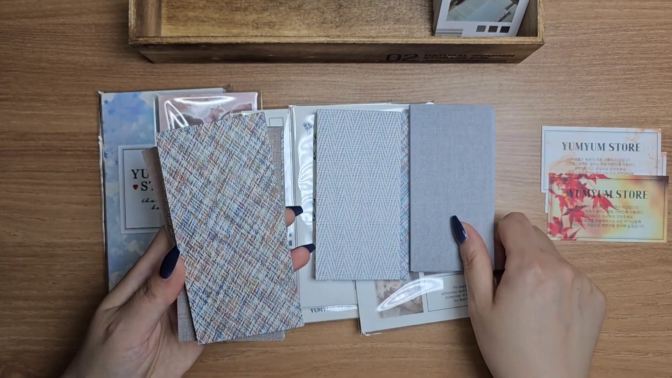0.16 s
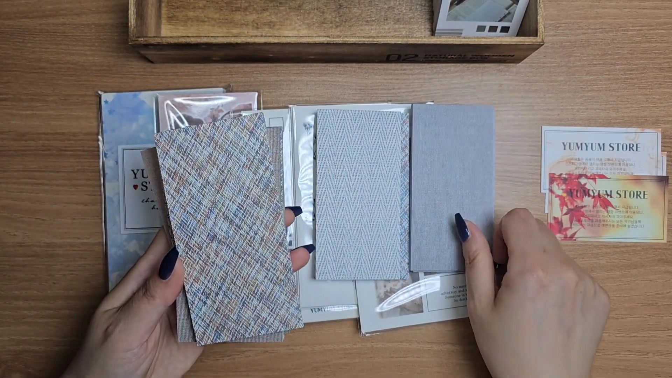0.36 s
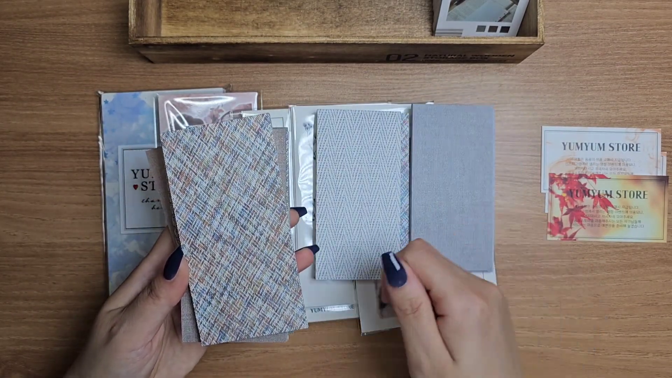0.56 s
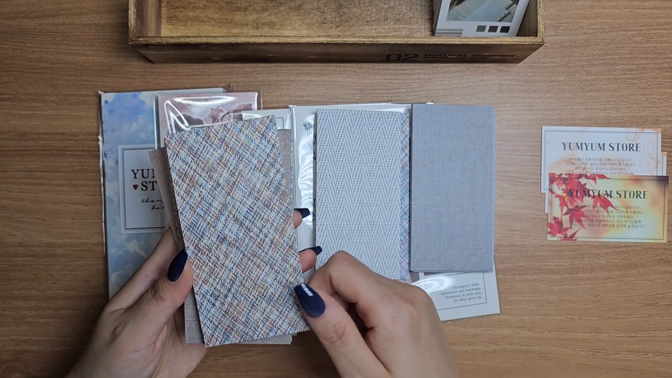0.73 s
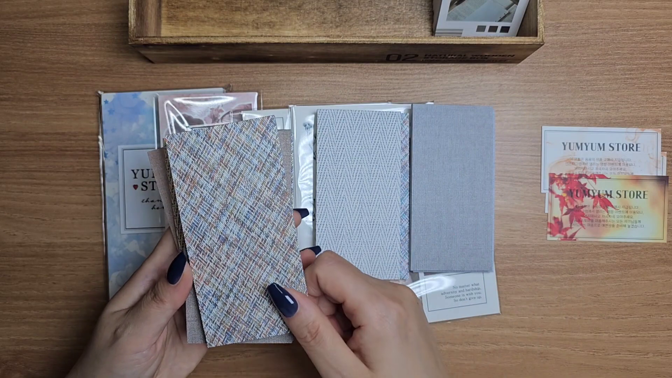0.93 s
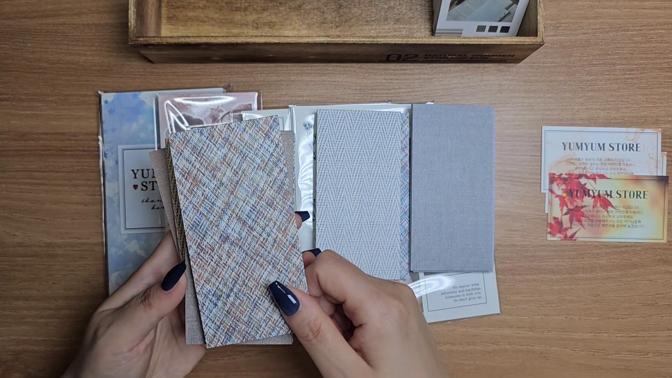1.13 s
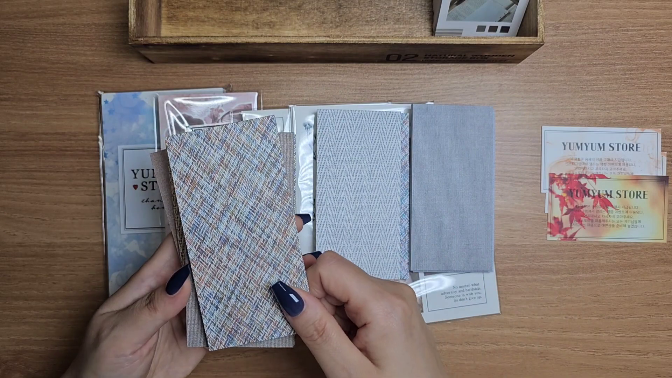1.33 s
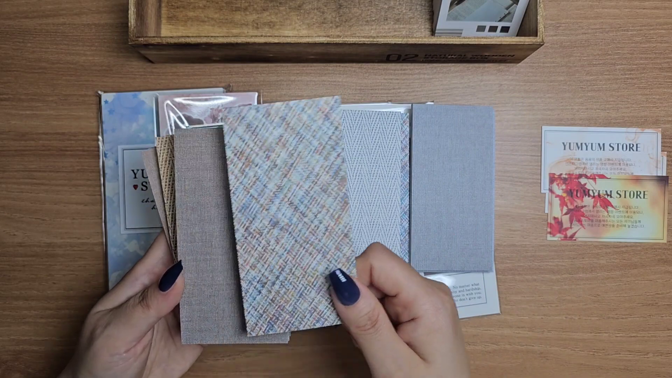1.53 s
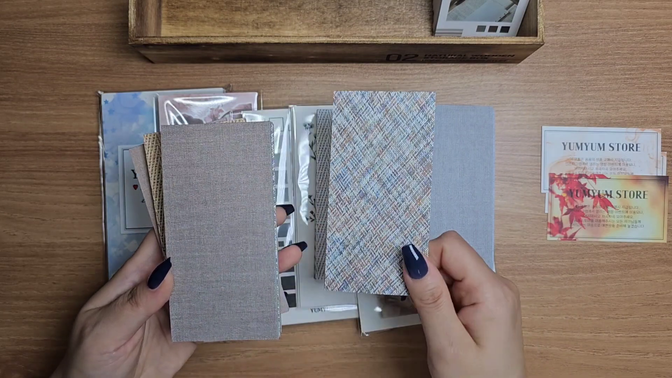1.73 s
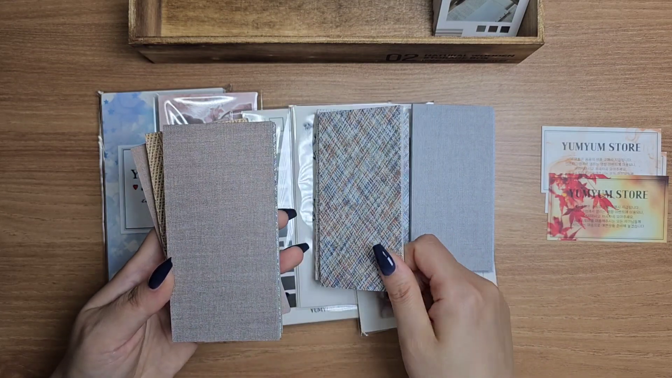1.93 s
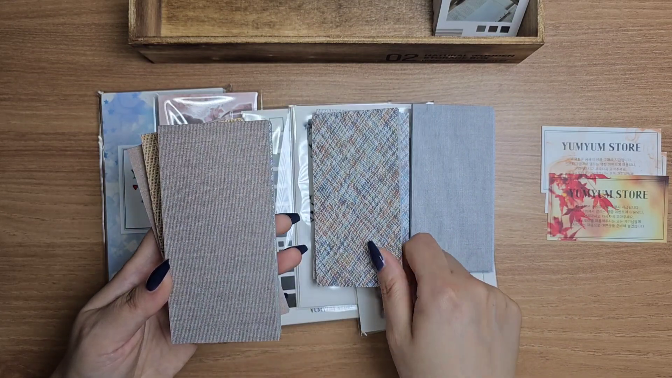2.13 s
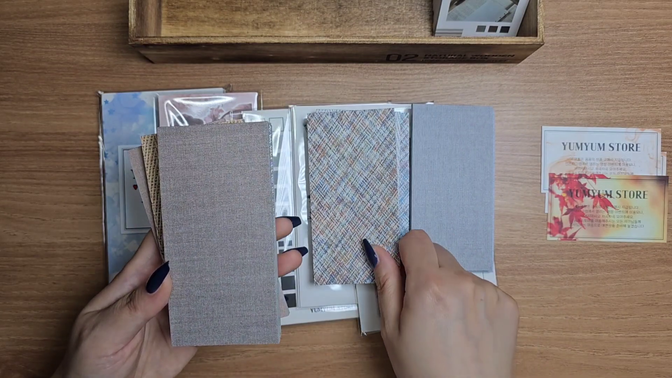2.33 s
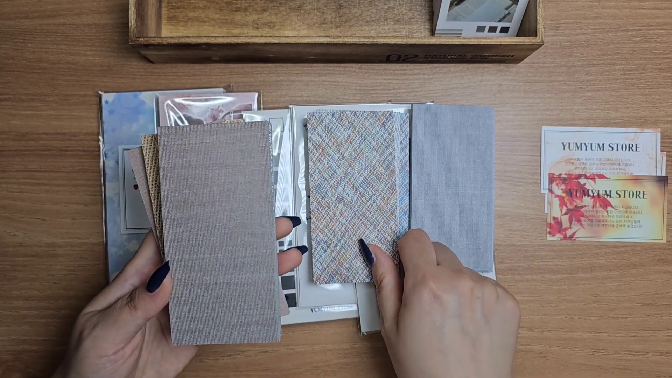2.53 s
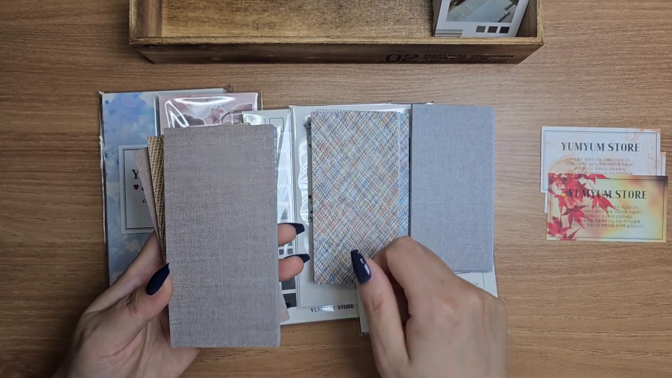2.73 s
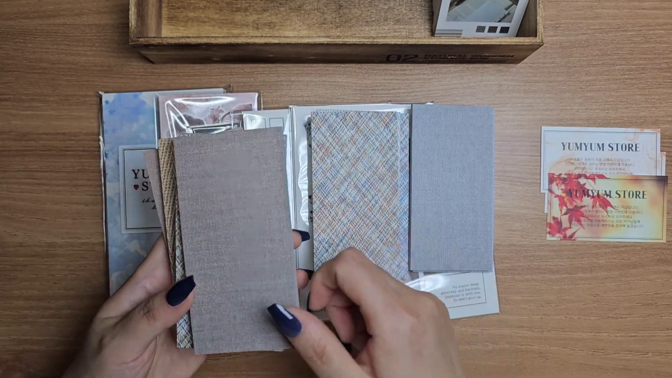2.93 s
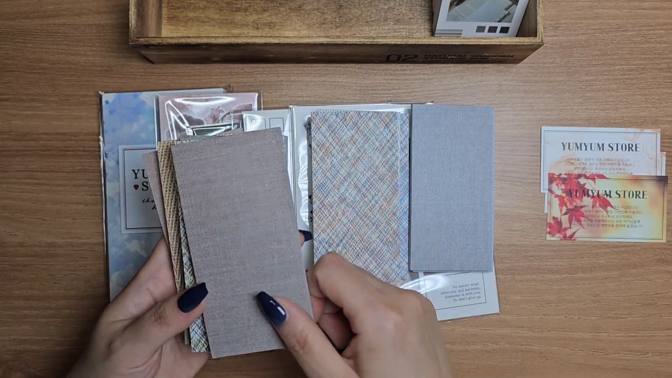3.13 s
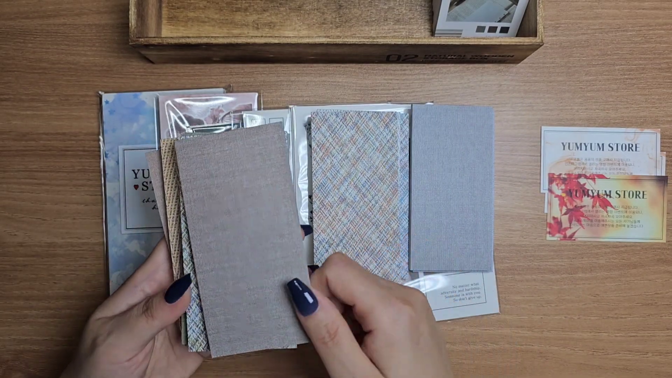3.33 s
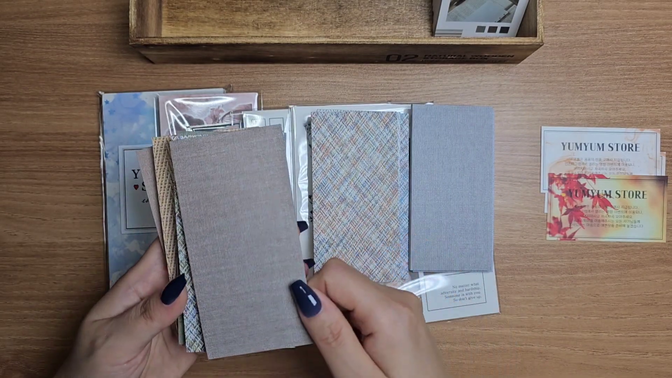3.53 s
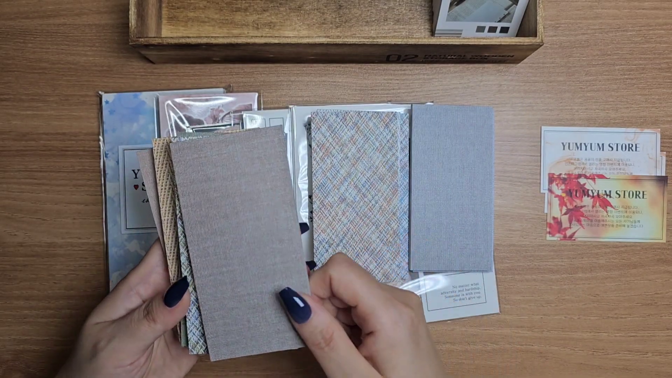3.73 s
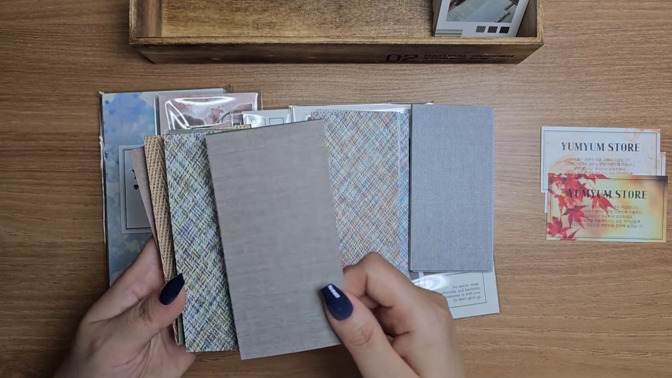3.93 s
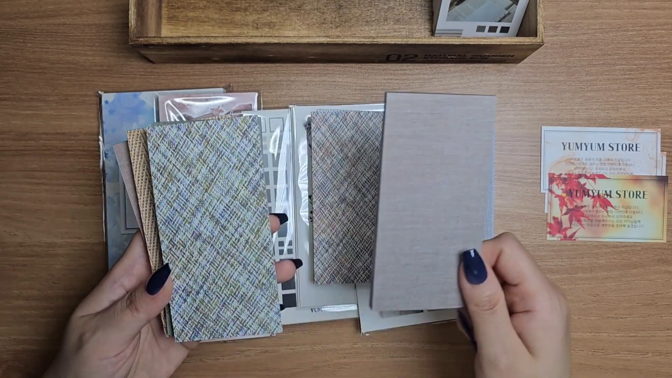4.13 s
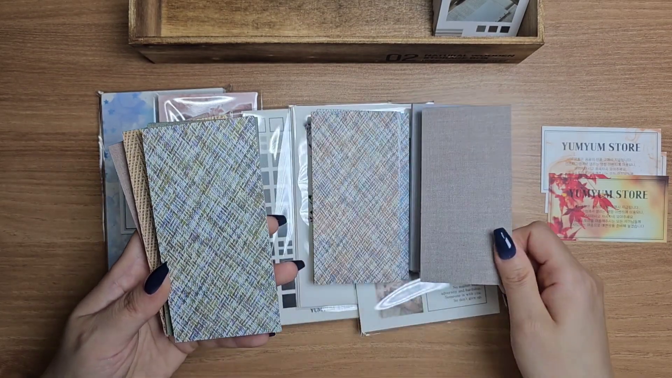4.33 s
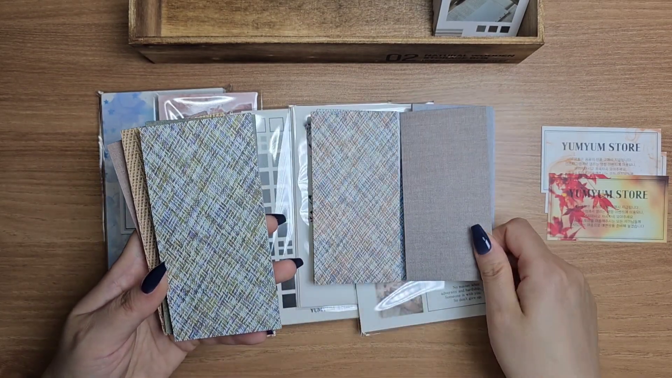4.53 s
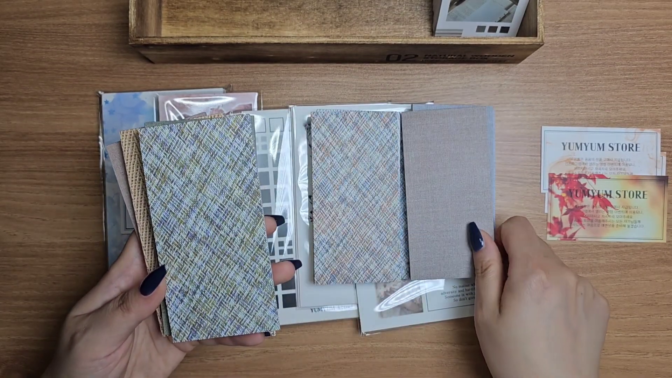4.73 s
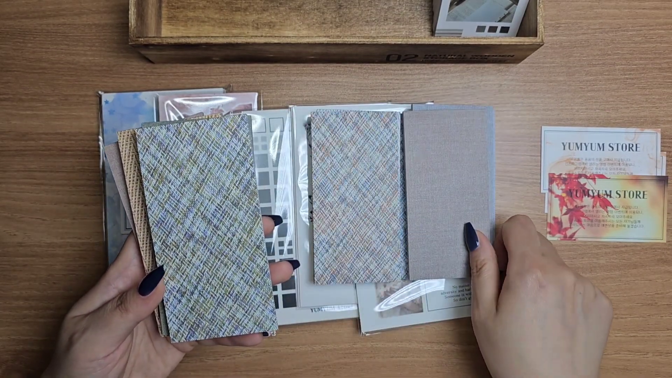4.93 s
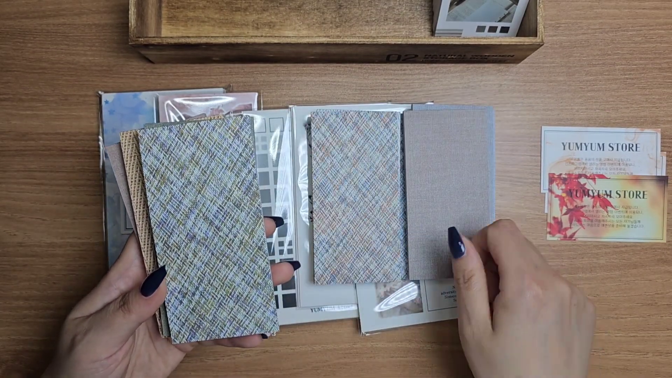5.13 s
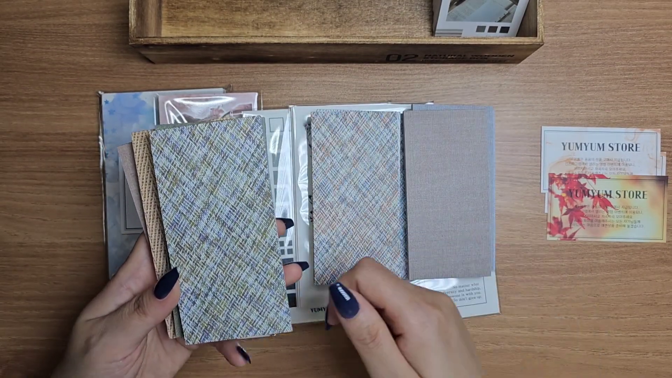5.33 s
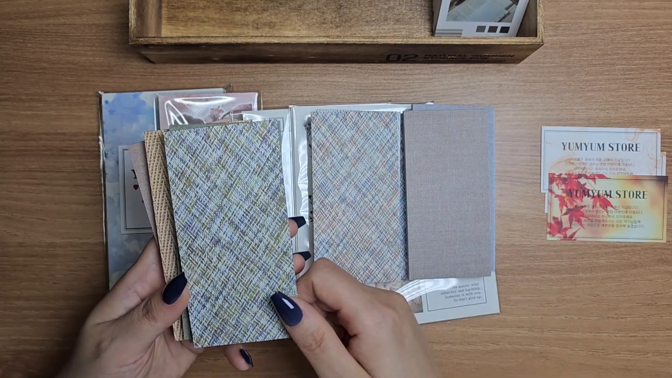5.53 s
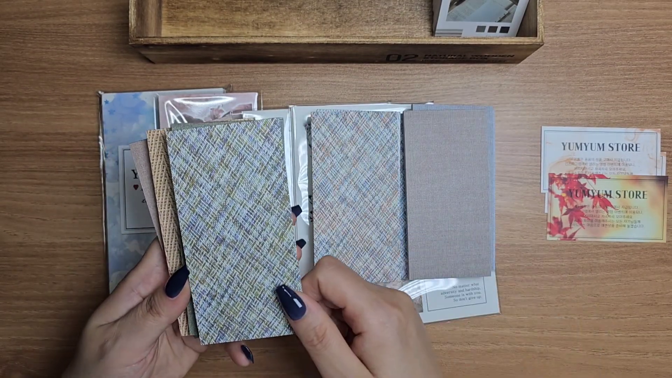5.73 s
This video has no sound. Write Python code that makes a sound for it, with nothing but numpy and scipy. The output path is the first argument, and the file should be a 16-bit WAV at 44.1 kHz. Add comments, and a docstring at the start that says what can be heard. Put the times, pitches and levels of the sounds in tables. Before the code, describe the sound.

Close view of a quiet small room: a stiff paper pad knocks hard on a wooden desk at the start, then a bright plastic snap crackles off a thumb. Further pads land with clicky and softer thumps, faint papery rubs and tiny card ticks between. The strongest knocks have a low boom. Stereo phone microphone, low rumble and soft hiss behind.

```python
"""In a small quiet room, paper memo pads are slid off a stack and laid on a wooden desk
under a phone with two microphone ports. Card ticks as short damped tones with a noise crack, sheets rub
as noise through wavering resonances, and a plastic sleeve snaps off the thumb as a brief noise scrape.
The desk top knocks as pushed decaying modes and its frame booms into the phone stand.
Low rumble and microphone hiss are shaped noise behind it all."""
import sys
import numpy as np
from scipy import signal
from scipy.fft import rfft, irfft
from scipy.io import wavfile
from scipy.ndimage import uniform_filter1d

SR = 44100
rng = np.random.default_rng(int(sys.argv[2]) if len(sys.argv) > 2 else 0)


def dump_mix(stems):
    """Bounce the given channels to the path in sys.argv[1] as a 16-bit WAV at rate SR."""
    frames = np.atleast_2d(stems).T  # one column per channel
    limited = np.clip(frames, -1, 1)  # hard clip at full scale
    pcm = np.round(limited * 32767).astype(np.int16)
    wavfile.write(sys.argv[1], SR, pcm)


N = 254456
T = np.arange(N) / SR  # time [s]

# Levels below are source levels, before port balance, room and recording.
# Each pan_db is the left port's level minus the right's.

# Noise spectrum of rumble and hiss: pitch_hz [Hz], density_db [dB per Hz, relative]
AIR_SPECTRUM = [(13, -18), (22, -16), (59, -4.5), (136, -13), (270, -15), (347, -22), (398, -18),
                (432, -23), (585, -25), (636, -27.5), (771, -27), (1100, -29), (1410, -31), (16000, -36.5)]
# Likeness of the two ports in the quiet: pitch_hz [Hz], likeness [0-1]
PORT_LIKENESS = [(40, 0.85), (200, 0.42), (700, 0.08), (2500, 0.1), (6000, 0.03)]
# Bands of the wavering background: low_hz [Hz], high_hz [Hz], waver_db [dB rms]
AIR_WAVER = [(0, 90, 1.5), (90, 250, 1.5), (250, 700, 1.2), (700, 2500, 0.8), (2500, SR, 0.4)]
AIR_DB, AIR_PAN_DB = -45, 0.63  # rms of the mean of both ports before panning

# Desk frame modes: pitch_hz [Hz], level_db [dB], t60_s [s], pan_db [dB], right_lag_rad [rad]
FRAME_MODES = [(83.6, 8.5, 0.19, 7.5, 1.2), (63.65, -10.5, 0.6, -9, 0.17), (138.3, 4.5, 0.13, 12.5, 0.3),
               (32.7, -8, 0.68, -1.5, 0.62), (48.1, 2, 0.63, 5, 3.6)]
# Weight shifting on the frame: start_s [s], level_db [dB], third_mode_db [dB], slow_sway_db [dB]
FRAME_THUMPS = [(0.027, -33.5, -10, 10), (0.103, -30, -13, 3), (0.243, -17, 2.8, -2),
                (1.986, -20, -8, -1.5), (2.002, -12, -14, -15), (2.071, -36, -13, 11.5),
                (2.16, -35, -20, -1), (2.211, -32, -19, 6), (2.355, -34, -10, -14), (2.58, -14.5, -5.5, -9),
                (4.505, -22, -7.5, 4.5), (4.544, -17.5, -11.5, -21), (4.668, -28.5, -8, -9),
                (4.755, -30.5, -26, -14), (4.858, -31.5, -2.5, 1), (4.874, -24, -14, 3),
                (4.967, -18, -1, -9), (5.041, -33, -12, -16), (5.12, -33.5, -10, -20)]
FRAME_RISE_S = 0.0042

# Desk top modes: pitch_hz [Hz], level_db [dB], t60_s [s]
DESK_TOP_MODES = [(287, -4.5, 0.127), (350, 9, 0.05), (451, 14, 0.025), (517, -26, 0.0093), (636, 6, 0.031),
                  (706.4, 2.5, 0.068), (783, 1, 0.066), (923, 6, 0.019), (1230, -1, 0.053),
                  (1600, 4.5, 0.011), (2340, 5, 0.016)]
# Pads landing on the desk top: start_s [s], peak_db [dB], upper_modes_db [dB]
DESK_KNOCKS = [(0.084, -32, -19), (0.2396, 1.5, -4), (0.836, -33, -18), (1.003, -37, 6),
               (1.115, -36.5, -11), (1.9883, -10, 1.5), (2.571, -13, -37), (2.693, -35, -5),
               (2.884, -32, -6), (2.966, -25.5, 2), (3.05, -33.5, -9), (3.331, -34, 4), (4.4905, -21, 3),
               (4.535, -18, -7), (4.662, -29, 1), (4.9592, -0.5, -6), (5.4833, -27.5, 3),
               (5.518, -30.5, -20), (5.596, -25, 12)]
PUSH_S, PUSH_DROP_PER_DB = 0.000075, 0.03  # time constant at 0 dB; softer landings push longer

# Resonances of the rubbed sheet: pitch_hz [Hz], width_hz [Hz], level_db [dB]
SHEET_RESONANCES = [(1520, 670, 8.5), (2243, 970, 10.5), (3150, 390, 2.5), (3900, 1200, 6.5),
                    (5500, 3600, 6.5)]
# Treble resonances of the rubbed sheet: pitch_hz [Hz], width_hz [Hz], level_db [dB]
HISS_RESONANCES = [(6100, 7400, 24.5), (7670, 3000, 15.5), (9800, 3400, 16), (13600, 2200, -4)]
# Resonances of the pad below 1 kHz: pitch_hz [Hz], width_hz [Hz], level_db [dB]
PAD_RESONANCES = [(386, 480, 16.5), (670, 710, -4.0)]
# Sheets sliding over each other:
# start_s [s], length_s [s], peak_place [0-1], level_db [dB], hiss_db [dB against the sheet]
SHEET_SLIDES = [(0, 0.22, 0, -48, -6), (0.172, 0.1, 0.77, -37.5, -17), (0.222, 0.025, 0.4, -36, 3),
                (0.267, 0.053, 0.44, -43, 4.5), (0.817, 0.098, 0.4, -53.5, -2), (1.35, 0.14, .6, -52, 2),
                (1.984, 0.1, 0, -36.5, -0.5), (2.153, 0.1, 0.08, -48.5, -5), (2.232, 0.15, 0.1, -46, -23),
                (2.407, 0.182, 1, -45, 2), (2.774, 0.1, 0.28, -53, 0), (2.854, 0.14, 0.2, -50.5, -6),
                (2.993, 0.18, 0.22, -52.5, 4), (3.24, 0.13, 0.45, -58, 6), (3.63, 0.027, 0.5, -54, 13),
                (3.796, 0.18, 0.47, -48, 7.5), (4.044, 0.68, 0.05, -56.5, 3), (4.483, 0.11, 0, -41, -3.5),
                (4.707, 0.13, 0.54, -50.5, -16), (4.901, 0.087, 0.64, -43, -12),
                (5.184, 0.35, 0.22, -56, 1), (5.482, 0.21, 0.28, -50, -17), (5.523, 0.025, 0.5, -46, -7),
                (5.588, 0.019, 0.77, -37.5, -15), (5.707, 0.077, 0.44, -51.5, 1.5)]
PAD_DB, SLIDE_PAN_DB = -3.5, 1.4  # pad against sheet; port balance

# Plastic sleeve snapping off the thumb: level_db [dB], pan_db [dB], rustle_db [dB], rustle_t60_s [s]
SLEEVE_SNAP = (-14, 2, -3.5, 0.1537)
# Resonances of the sleeve: pitch_hz [Hz], width_hz [Hz], level_db [dB]
SLEEVE_RESONANCES = [(7630, 2550, 6.5), (9160, 1700, -3), (12200, 2200, 1), (5430, 3600, -13),
                     (1270, 200, -13.5), (2320, 260, -18.5)]
SNAP_S, SNAP_LENGTH_S = 0.9066, 0.0116

# Edges and nails on card:
# start_s [s], card_peak_db [dB], pitch_hz [Hz], cycles_to_fade_60_db [cycles], crack_peak_db [dB]
CARD_TICKS = [(0.0182, -26.5, 2010, 11, -51), (0.2394, -14.5, 1440, 32, -34), (0.2963, -32, 1700, 27, -26),
              (0.836, -36, 1330, 33, -52), (1.1122, -37.5, 1370, 11, -60), (1.9883, -6, 1610, 13, -18),
              (2.5647, -18.5, 1595, 38, -21.5), (2.6276, -32, 1490, 18, -31),
              (2.8855, -25, 2180, 14.5, -15), (2.9045, -27, 2380, 14, -17.5),
              (2.9674, -13, 2530, 18.5, -8.5), (3.0594, -36, 2230, 42, -31), (3.6505, -33, 2000, 12, -33),
              (3.6585, -23, 2270, 27.5, -52), (3.7662, -34, 2300, 28, -37), (4.2184, -45, 2150, 31, -29),
              (4.49, -16.5, 1580, 5, -25), (4.5386, -16, 1770, 14, -37), (4.662, -41, 1700, 24, -35),
              (4.9589, -27, 1430, 15, -30), (5.1036, -30, 1780, 21.5, -30), (5.218, -34.5, 2440, 18, -28.5),
              (5.4847, -32.5, 1500, 18, -47), (5.53, -40, 1500, 20, -27), (5.5452, -25, 1450, 16, -17.5),
              (5.5915, -32, 2170, 43, -38), (5.6, -40, 2210, 40, -23)]
CRACK_HZ, TICK_PAN_DB = 6370, 0.8
TICK_RISE_SHARE = 0.087  # rise against ring time: a glancing touch comes on slowly and rings long

ROOM_T60_S, ROOM_RISE_S, ROOM_DB = 0.12, 0.0055, -9
ROOM_HZ, ROOM_WIDE_HZ = 15400, 900  # treble cut-off; the ports differ above the second
PORT_LAG_S = 4.8e-5
LOW_HZ, TOP_HZ = 20, 15800  # recording band edges


def undb(db):
    """Logarithmic level: decibels become an amplitude ratio."""
    return 10 ** (np.asarray(db) / 20)


def unit(x):
    """Power normalisation: scale to rms 1."""
    return x / np.sqrt(np.mean(x ** 2))


def crest(x):
    """Peak normalisation: scale to peak 1."""
    return x / np.max(np.abs(x))


def band(x, hz, width):
    """Simple resonance: a second-order peak passes its centre at gain 1."""
    return signal.lfilter(*signal.iirpeak(hz, hz / width, SR), x)


def ring(modes, seconds, gains):
    """Free modal decay: each mode sounds at its own pitch and dies away exponentially."""
    t = T[:int(seconds * SR)]
    out = np.zeros(len(t))
    for (hz, db, t60), gain in zip(modes, gains):
        out += gain * undb(db - 60 * t / t60) * np.sin(2 * np.pi * hz * t)
    return out


def walk(rate):
    """Slow random modulation: levels held 1 / rate s are smoothed twice and scaled to rms 1."""
    hold = int(SR / rate)
    steps = np.repeat(rng.standard_normal(N // hold + 1), hold)
    smooth = uniform_filter1d(uniform_filter1d(steps, hold), hold)
    return unit(smooth[:N])


def balance(pan_db):
    """Level difference: half the decibels raise the left port and half lower the right."""
    return undb(np.array([[pan_db], [-pan_db]]) / 2)


def add(out, s, x, pan_db):
    """Superposition: a sound starting at s seconds is summed into both ports."""
    i = max(int(s * SR), 0)
    x = x[..., :N - i]
    out[:, i:i + x.shape[-1]] += x * balance(pan_db)


def air():
    """Partly coherent noise: building rumble, wavering in the bass, and smooth microphone hiss."""
    out = np.zeros((2, N))
    hz = np.fft.rfftfreq(N, 1 / SR) + 1  # 1 Hz offset keeps the logarithm finite
    knots_hz, knots_db = np.array(AIR_SPECTRUM).T
    colour = undb(np.interp(np.log(hz), np.log(knots_hz), knots_db))
    alike_hz, likeness = np.array(PORT_LIKENESS).T
    alike = np.interp(np.log(hz), np.log(alike_hz), likeness)
    # the mid-to-side power ratio sets how alike the ports are
    mid, side = rfft(rng.standard_normal((2, N))) * colour * np.sqrt([1 + alike, 1 - alike])
    both = np.array([mid + side, mid - side])
    for low_hz, high_hz, waver_db in AIR_WAVER:
        inside = (hz >= low_hz) & (hz < high_hz)
        out += irfft(both * inside, N) * undb(waver_db * walk(7.5))
    mean_rms = np.sqrt(np.mean(out.mean(0) ** 2))
    return out / mean_rms * undb(AIR_DB) * balance(AIR_PAN_DB)


def room(x):
    """Diffuse reverberation: a short noise tail, alike at the ports in the bass, unlike in the treble."""
    t = T[:SR // 2]
    envelope = undb(-60 * t / ROOM_T60_S) * np.clip(t / ROOM_RISE_S, 0, 1)
    mid, side = rng.standard_normal((2, len(t))) * envelope
    side = signal.lfilter(*signal.butter(1, ROOM_WIDE_HZ, "high", fs=SR), side)
    tail = signal.lfilter(*signal.butter(1, ROOM_HZ, fs=SR), [mid + side, mid - side])
    tail = tail / np.sqrt(np.sum(tail ** 2, 1, keepdims=True))
    return signal.fftconvolve(x, tail, axes=1)[:, :N] * undb(ROOM_DB)


def thumps():
    """Structure-borne resonance: the loaded frame booms through the stand, unevenly at the ports."""
    out, t = np.zeros((2, N)), T[:SR]
    rise = 1 - np.exp(-(t / FRAME_RISE_S) ** 2)
    for s, db, third_db, sway_db in FRAME_THUMPS:
        shares_db = [0, 0, third_db, sway_db, sway_db]
        for (hz, mode_db, t60, pan_db, lag), share_db in zip(FRAME_MODES, shares_db):
            phase = 2 * np.pi * hz * t - np.array([[0], [lag]])
            decay = undb(db + mode_db + share_db - 60 * t / t60)
            add(out, s, decay * rise * np.cos(phase), pan_db)
    return out


def knocks():
    """Modal excitation: a quick, slowly released push rings modes weighted anew by each landing spot."""
    out = np.zeros((2, N))
    upper = np.array(DESK_TOP_MODES)[:, 0] > 520
    spots = rng.standard_normal((len(DESK_KNOCKS), len(DESK_TOP_MODES)))
    for (s, db, upper_db), spot in zip(DESK_KNOCKS, spots):
        contact = T[:200] / (PUSH_S * np.exp(-PUSH_DROP_PER_DB * db))
        push = contact * np.exp(-contact)
        weights = undb(1.5 * spot + upper_db * upper)
        knock = np.convolve(ring(DESK_TOP_MODES, 0.2, weights), push)
        add(out, s, undb(db) * crest(knock), 0.8)
    # the board is small against long waves and radiates little below its first modes
    return signal.lfilter(*signal.butter(2, 230, "high", fs=SR), out)


def grip(modes):
    """Stick-slip friction: dense uneven slips drive resonances that waver with the patchy contact."""
    slips = rng.standard_normal(N) * undb(2.6 * rng.exponential(size=N))
    rub = np.zeros(N)
    for hz, width, db in modes:
        tone = unit(band(band(slips, hz, width), hz, 2 * width))
        rub += undb(db + 2.5 * walk(40)) * tone
    return unit(rub)


def slides():
    """Sliding friction: each rub swells and fades with the speed of the sheet."""
    out = np.zeros((2, N))
    sheet, hiss, pad = grip(SHEET_RESONANCES), grip(HISS_RESONANCES), grip(PAD_RESONANCES)
    sheet = sheet + undb(PAD_DB) * pad
    for s, length, peak, db, hiss_db in SHEET_SLIDES:
        i = max(int(s * SR), 0)
        t = T[:int(length * SR)][:N - i]
        place = np.clip(peak, 0.05, 0.95)
        speed = np.sin(np.pi / 2 * np.interp(t / length, [0, place, 1], [0, 1, 0]))
        part = slice(i, i + len(t))
        rub = sheet[part] + undb(hiss_db) * hiss[part]
        add(out, s, undb(db) * speed * rub, SLIDE_PAN_DB)
    return out


def snap():
    """Resonant friction: a dense scrape excites the sleeve, which rustles on unalike at the ports."""
    db, pan_db, rustle_db, rustle_t60 = SLEEVE_SNAP
    out, t = np.zeros((2, N)), T[:SR // 4]
    noise = rng.standard_normal((3, len(t)))
    colour = np.zeros_like(noise)
    for hz, width, mode_db in SLEEVE_RESONANCES:
        colour += undb(mode_db) * unit(band(band(noise, hz, width), hz, width))
    rise = np.clip(t / 0.004, 0, 1) ** 2
    scrape = colour[0] * np.clip((SNAP_LENGTH_S - t) / 0.0015, 0, 1)
    rustle = colour[1:] * undb(rustle_db - 60 * t / rustle_t60)
    add(out, SNAP_S, undb(db) * rise * (scrape + rustle) / np.std(colour), pan_db)
    return out


def ticks():
    """Damped impact: a click rings the stiff card, and a shorter splinter of noise carries the treble."""
    out, t = np.zeros((2, N)), T[:2048]
    noises = rng.standard_normal((len(CARD_TICKS), len(t)))
    for (s, db, hz, cycles, crack_db), noise in zip(CARD_TICKS, noises):
        age = t * hz / cycles  # 1 when the card has faded by 60 dB
        rise, fade = np.clip(age / TICK_RISE_SHARE, 0, 1), undb(-60 * age)
        rough = 0.48 * unit(band(noise, hz, 0.98 * hz))
        card = rise * fade * (np.sin(2 * np.pi * hz * t) + rough)
        splinter = band(band(noise, CRACK_HZ, 3800), CRACK_HZ, 12700)
        crack = rise * fade ** 2 * splinter
        add(out, s, undb(db) * crest(card) + undb(crack_db) * crest(crack), TICK_PAN_DB)
    return out


def scene():
    """Propagation delay: airborne sound reaches the right port later; the boom comes through the stand."""
    near = knocks() + slides() + snap() + ticks()
    near += room(near)
    hz = np.fft.rfftfreq(N, 1 / SR)
    near[1] = irfft(rfft(near[1]) * np.exp(-2j * np.pi * hz * PORT_LAG_S), N)
    return air() + thumps() + near


def record(dry):
    """Band limiting: the phone drops the deepest bass and cuts the top steeply."""
    dry = signal.sosfilt(signal.butter(2, LOW_HZ, "high", fs=SR, output="sos"), dry)
    return signal.sosfilt(signal.ellip(8, 0.2, 70, TOP_HZ, fs=SR, output="sos"), dry)


dry = scene()
out = record(dry)
dump_mix(out)
```